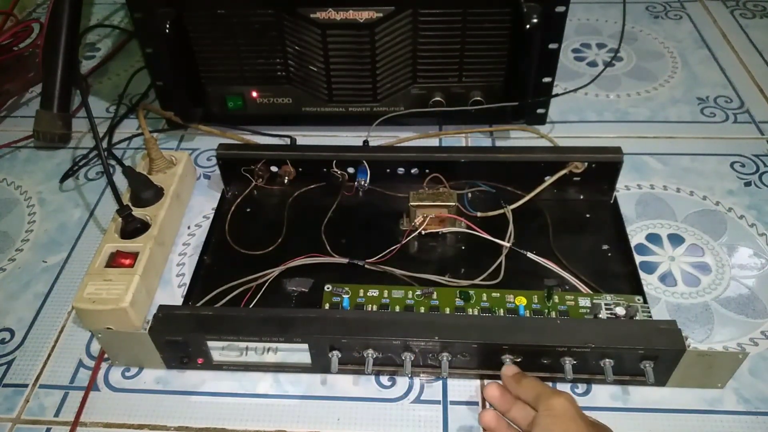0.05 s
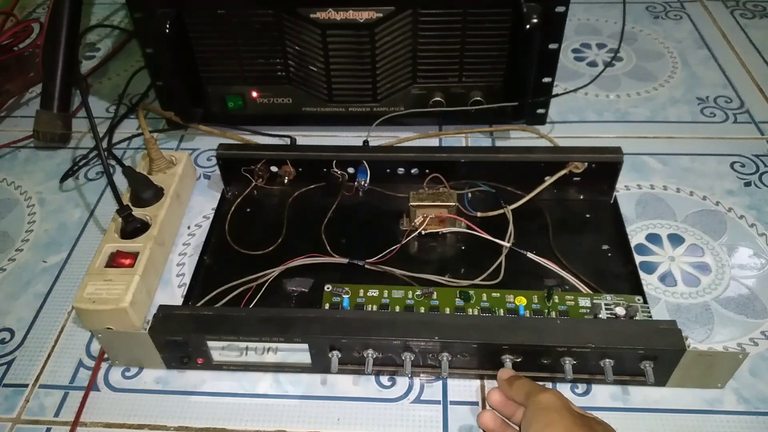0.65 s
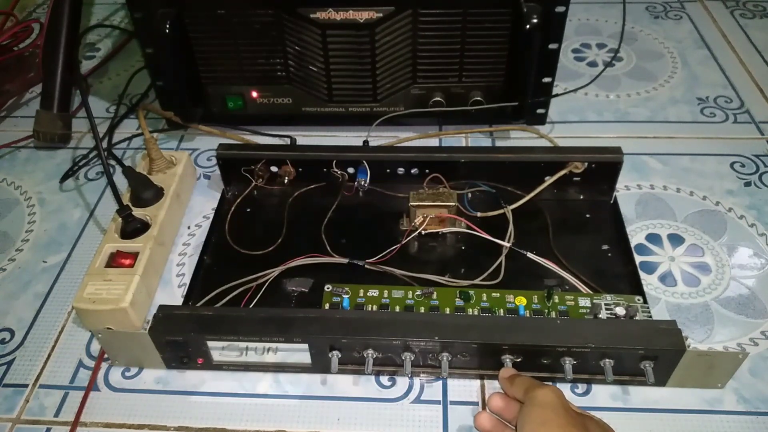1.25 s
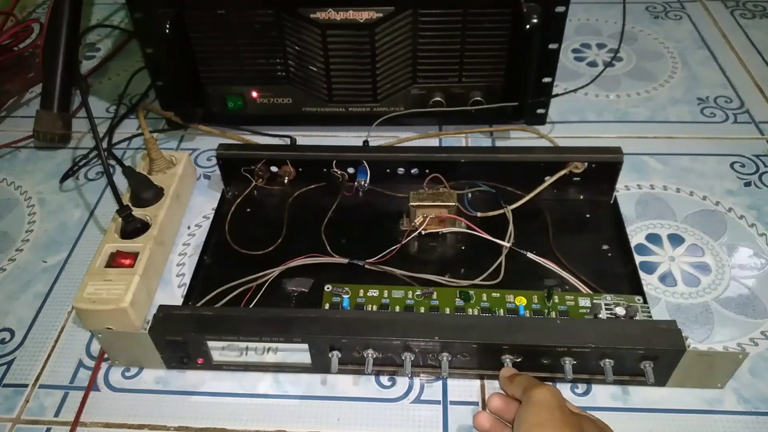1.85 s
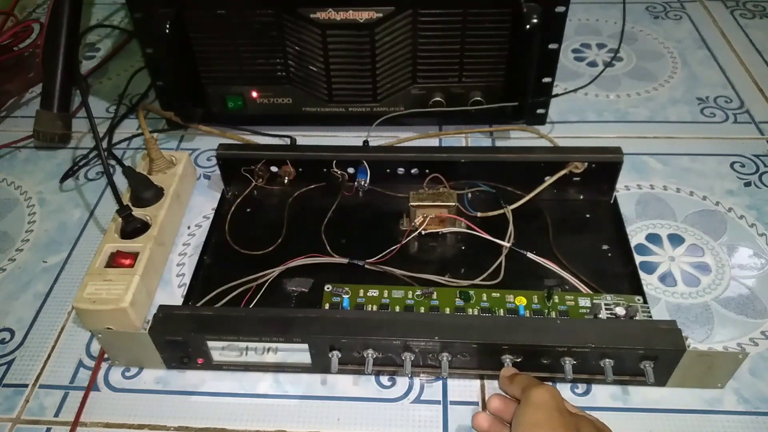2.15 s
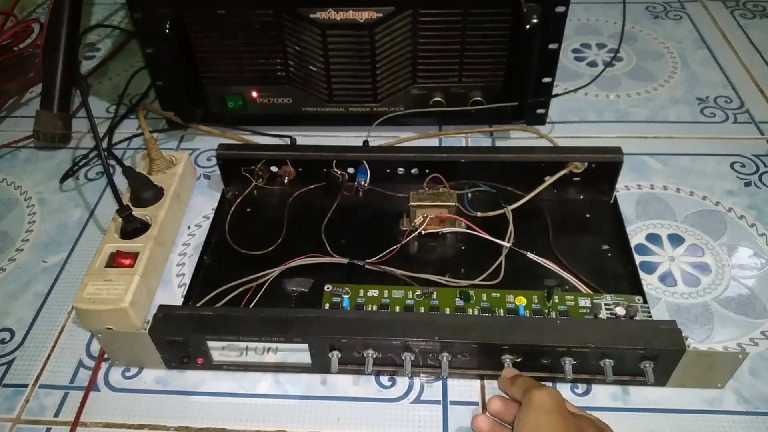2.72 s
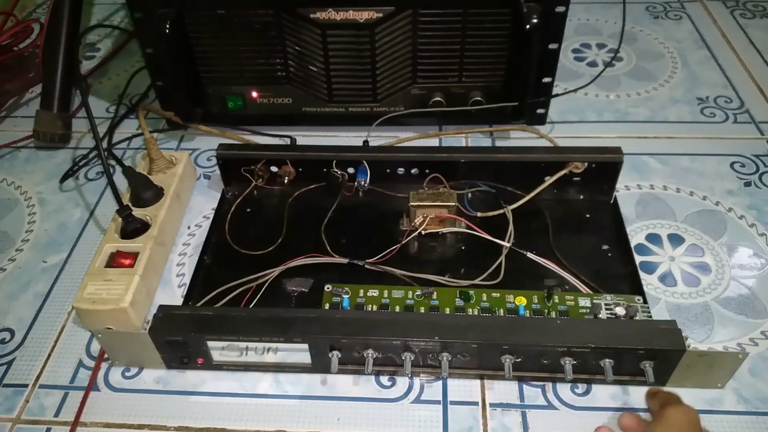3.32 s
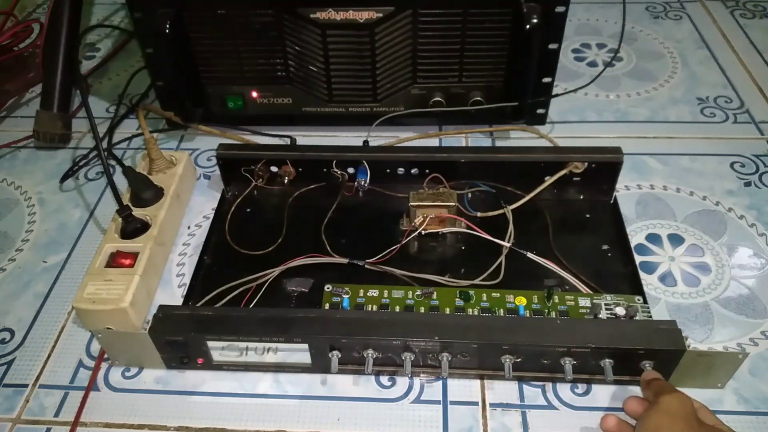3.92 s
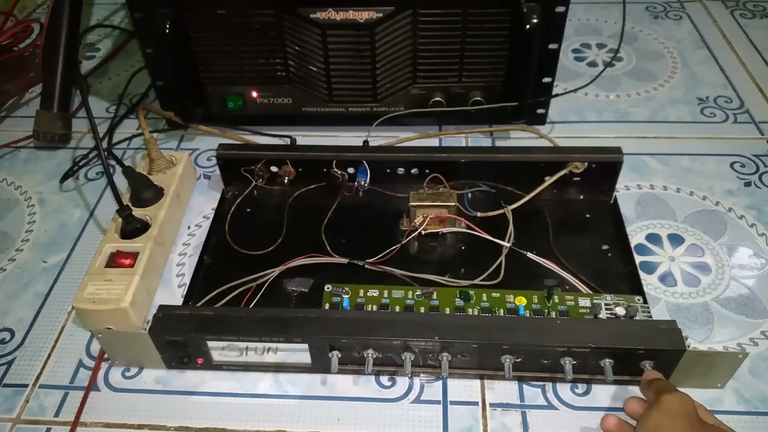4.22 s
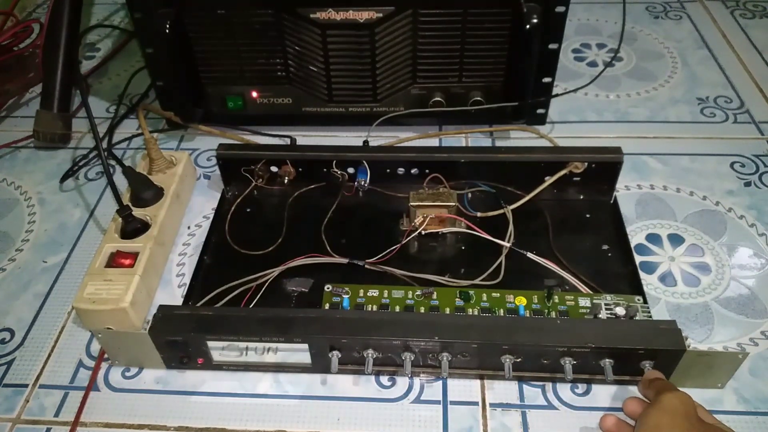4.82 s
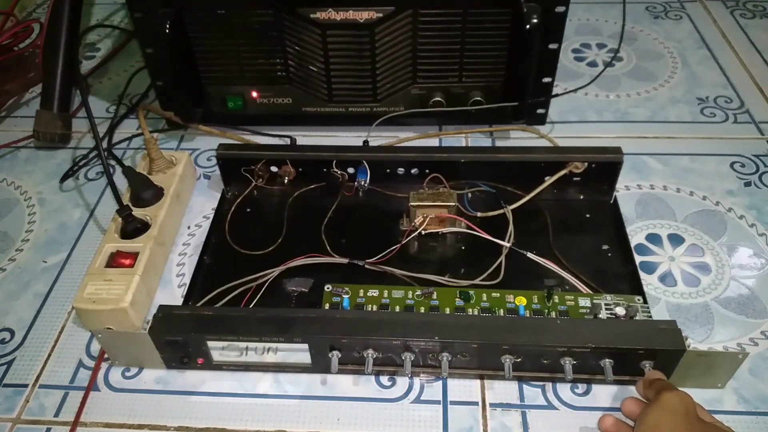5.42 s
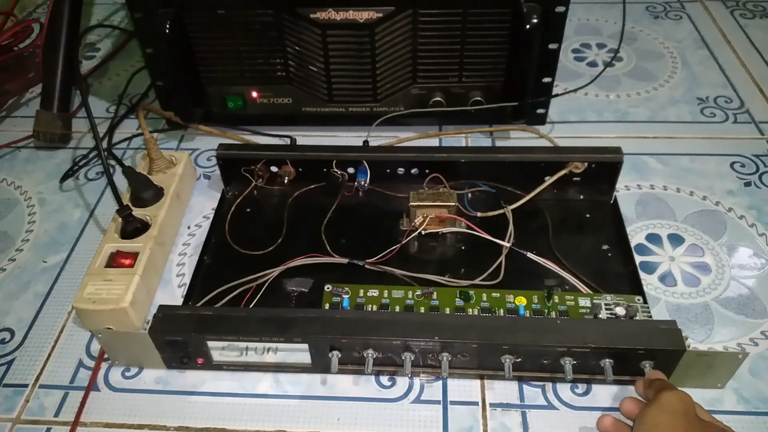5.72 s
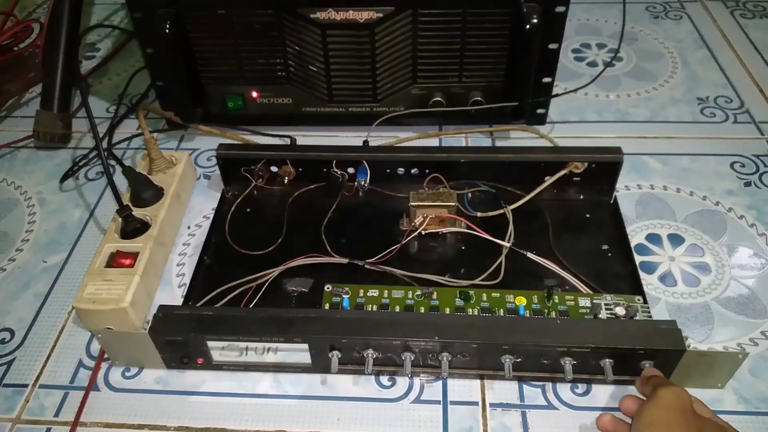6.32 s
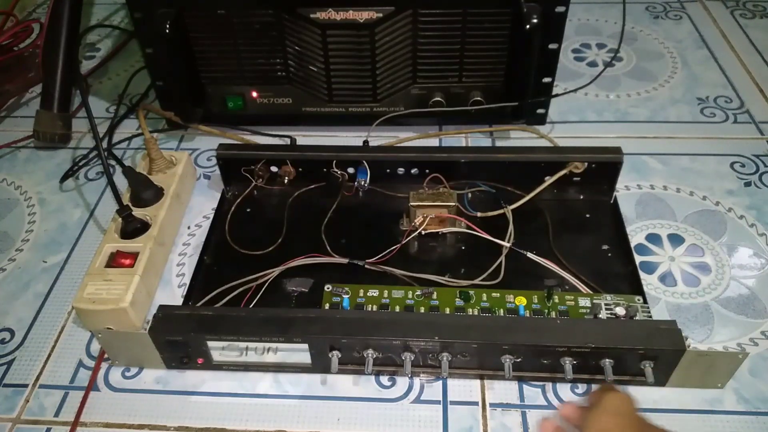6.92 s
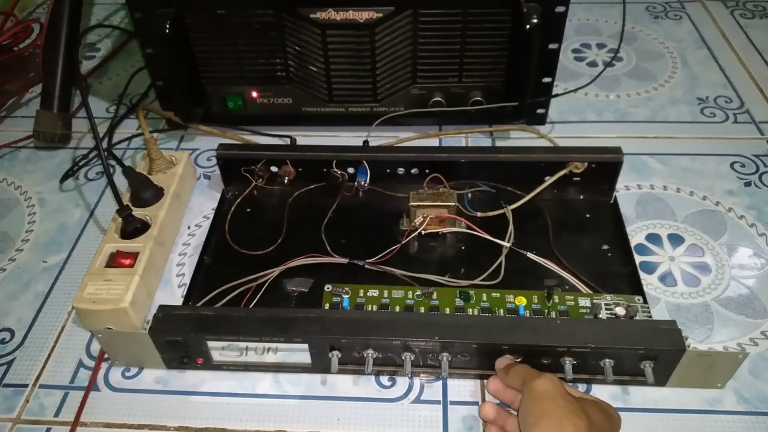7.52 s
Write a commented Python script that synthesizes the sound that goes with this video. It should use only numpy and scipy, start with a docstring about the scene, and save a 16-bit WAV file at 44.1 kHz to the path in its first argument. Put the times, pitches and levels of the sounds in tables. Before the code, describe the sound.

Two small cooling fans whir steadily in an amplifier, a rush of air with a pulsing hum and two faint knob ticks.

```python
"""A rush of air and blade tones beating about five times a second: two small seven-bladed fans,
at slightly different speeds, cool an amplifier on a tiled floor. Case and room colour the rush;
a hum and a thin whine lie under it. Early on come two soft microphone bumps; a hand makes two
faint ticks and a rub at the knobs. Near the end a low drone joins briefly."""
import sys
import numpy as np
from scipy import signal
from scipy.fft import rfft, irfft
from scipy.io import wavfile
from scipy.ndimage import uniform_filter1d

SR = 44100
rng = np.random.default_rng(int(sys.argv[2]) if len(sys.argv) > 2 else 0)


def dump_mix(stems):
    """Bounce the given channels to the path in sys.argv[1] as a 16-bit WAV at rate SR."""
    frames = np.atleast_2d(stems).T  # one column per channel
    limited = np.clip(frames, -1, 1)  # hard clip at full scale
    pcm = np.round(limited * 32767).astype(np.int16)
    wavfile.write(sys.argv[1], SR, pcm)


N = 337806

# Speed deficit of the slow fan: t/s, slip/Hz
FAN_SLIP = [(0.0, 0.755), (0.7, 0.659), (1.5, 0.697), (2.2, 0.772), (3.2, 0.737), (4.0, 0.795),
            (5.2, 0.729), (6.2, 0.688), (7.66, 0.696)]
# Tones per fan: shaft harmonic (rounded in use), left level/dB, right level/dB, left lead/rad
FAST_FAN_TONES = [(1, -67, -70, -1), (7, -41, -45, 0.24), (14, -62.5, -63.5, 1.8), (19.75, -72.5, -65, 2.6),
                  (21, -69.5, -68, 3), (28, -64.5, -71, -0.3), (30, -73.5, -78, 0),
                  (32, -63.5, -65.5, -1.5), (35, -71.5, -84, 2.5), (36, -70, -75.5, -2.5),
                  (44, -84.5, -77.5, -7.5), (60, -72, -81, -5.5)]
SLOW_FAN_TONES = [(1, -66, -66, -.4), (7, -42.5, -46.5, 0.23), (14, -59, -61, 0.086),
                  (21, -70, -69.5, 0.58), (28, -59.5, -68, .6), (30, -78, -80.5, 1.7)]
# Slow timbre changes: t/s, mid-range rush gain/dB, upper fan tone gain/dB
TIMBRE = [(0, -0.4, -7), (1.3, -0.3, -4), (2.1, 0.8, -1), (3.2, 0.6, 1), (5.0, 0.4, 0.5), (6.5, .3, -1),
          (7.66, 1.1, -3)]
# Air rush, in-phase (mid) and antiphase (side) parts: f/Hz, level in 1 Hz/dB
AIR_MID = [(20, -70), (32, -74.5), (100, -78), (120, -66), (250, -67.5), (520, -74.5), (800, -81),
           (1100, -80.5), (1600, -89.5), (3400, -94.5), (6200, -108.6), (9300, -106.0), (11300, -125.0),
           (15500, -131.9)]
AIR_SIDE = [(20, -73), (35, -78), (95, -88), (140, -86), (330, -78.5), (700, -84), (800, -82),
            (1600, -88.5), (3400, -93.5), (6200, -108.3), (9300, -122.1), (11500, -140.1), (15500, -140.0)]
# Peaks and dips of case and room: f/Hz, width/Hz, mid gain/dB, side gain/dB
CASE_ROOM_MODES = [(137.7, 33, 12, 10), (194, 10, -1, 11.5), (221.4, 10, 5.5, 4), (255.5, 20, 5, -5.5),
                   (317, 20, 3.5, -4), (355.6, 15, 5.5, -7), (390, 7, -4, -7.5), (443.8, 27, 7.5, 6.5),
                   (477, 16.4, 7, 5.5), (510, 46, 7.5, -1), (631.8, 33.4, 8, 4.5), (660, 13, 7, -4.5),
                   (683, 40, 1, 8.5), (787, 29, -5.5, 2.5), (938, 48, -5.5, -3), (1158, 24, -4, -1.5),
                   (1330, 27, 0.5, 0), (1507, 84, 1, 1.5), (2012, 110, 6, -4), (2650, 130, 3.5, -1.5),
                   (2840, 110, 2.5, -3), (3270, 140, 3, 2), (3480, 67, 3.5, 1.5), (3820, 95, 4, -2)]
# Rush balance: f/Hz, left minus right/dB
AIR_BALANCE = [(60.0, 1.5), (160.0, 1.5), (290.0, 1.5), (400.0, 0), (600.0, -1.5), (730.0, 2),
               (900.0, -0.5), (1150.0, 3.5), (1600.0, -2.5), (2450.0, 4.5), (4000.0, -0.5), (5200.0, 4.5),
               (7500.0, 5.5), (10200.0, -1)]
# Rush phase between channels: f/Hz, left lead/rad
AIR_LEAD = [(300, 0), (380, -0.081), (540, 0.56), (650, 1.4), (760, .6), (1100, 0.29), (1500, .1),
            (2200, 0.18), (3200, 0.085)]
# Random swells and dips in the rush's low rumble (105-175 Hz), before centring and scaling:
# t/s, level/dB
RUMBLE_SWELLS = [(0.0, -41.5), (0.21, -46.5), (0.44, -36), (0.48, -44.5), (0.71, -35), (0.75, -44.5),
                 (1.46, -40), (1.5, -46.5), (1.92, -47.5), (2.09, -38.5), (2.13, -52), (2.36, -38.5),
                 (2.67, -50), (2.69, -40.5), (4.95, -44), (5.01, -36), (5.05, -52), (5.16, -42),
                 (5.85, -43.5), (5.93, -35), (6.04, -45.5), (6.31, -35.5), (6.35, -44), (7.5, -44.5)]
# Hum and electrical whine: f/Hz, level/dB
HUM_TONES = [(62, -60), (8717, -89)]
# Two microphone bumps, one knob rub: t/s, 1/e half-width/s, low f/Hz, high f/Hz, level/dB
TOUCHES = [(.09, .05, 18, 40, -50), (.38, .05, 18, 45, -47), (2.1, 0.049, 3600, 5400, -66)]
# Knob contacts: t/s, impulse level/dB, settling delay/s, settling gain/dB
KNOB_TICKS = [(0.2738, -51, 0.01, -9), (1.3042, -44, 0.0029, -7)]
# Knob modes: f/Hz, gain/dB, T60/s
KNOB_RING = [(3190, 4.5, 0.011), (3700, -2, .007), (5200, -6, .006), (7670, -9.5, 0.013),
             (8460, -4, 0.0065), (9300, -3, 0.0056), (12000, -17, 0.0018)]


def from_db(db):
    return 10 ** (np.asarray(db) / 20)


def over_time(table):
    """Each value column, interpolated per sample."""
    t_s, *columns = np.transpose(table)
    return [np.interp(np.arange(N) / SR, t_s, column) for column in columns]


def bin_hz():
    return np.maximum(np.arange(N // 2 + 1) * SR / N, 1)


def over_frequency(table):
    """Value per FFT bin, interpolated on log f."""
    f_hz, values = np.transpose(table)
    return np.interp(np.log(bin_hz()), np.log(f_hz), values)


def drift(corner_hz):
    """Slow noise, unit variance."""
    slow = irfft(rfft(rng.standard_normal(N)) / (1 + (bin_hz() / corner_hz) ** 2) ** 2, N)
    return slow / slow.std()


def bandpass(x, edges_hz):
    """Zero-phase band filter."""
    return signal.sosfiltfilt(signal.butter(3, edges_hz, "band", fs=SR, output="sos"), x)


def tone(phase_rad, rms_db):
    return np.sqrt(2) * from_db(rms_db) * np.cos(phase_rad)


def fan(shaft_hz, tones, upper_db, waver_db, wobble_turns):
    """Shaft harmonics; the seventh, one push per blade, dominates."""
    turns = np.cumsum(shaft_hz) / SR + wobble_turns * drift(3.0)
    inflow_db = waver_db * drift(2.8)   # uneven inflow varies the blade load
    out = np.zeros((2, N))
    for harmonic, left_db, right_db, lead_rad in tones:
        phase_rad = 2 * np.pi * round(harmonic) * turns
        swell_db = inflow_db + upper_db * (harmonic > 20)
        out[0] += tone(phase_rad + lead_rad / 2, left_db + swell_db)
        out[1] += tone(phase_rad - lead_rad / 2, right_db + swell_db)
    return out


def airflow():
    """Turbulence at blades and grille, coloured by case and room."""
    level_db = np.array([over_frequency(AIR_MID), over_frequency(AIR_SIDE)])
    for f_hz, width_hz, mid_db, side_db in CASE_ROOM_MODES:
        peak = 1 / (1 + (2 * (bin_hz() - f_hz) / width_hz) ** 2)
        level_db += np.outer([mid_db, side_db], peak)
    mid, side = rfft(rng.standard_normal((2, N))) * from_db(level_db) * np.sqrt(SR / 2)
    pan = from_db(over_frequency(AIR_BALANCE) / 2) * np.exp(0.5j * over_frequency(AIR_LEAD))
    stereo = np.array([(mid + side) * pan, (mid - side) / pan])
    echo_share = over_frequency([(400, 0), (900, 1), (6000, 1), (8000, 0)])
    room = 1 + echo_share * (reflections() - 1)
    return irfft(stereo * room, N)


def reflections(count=24, echo_db=-27, longest_s=0.03):
    """Spectral ripple from early floor and wall echoes, per channel."""
    delay_samples = (rng.uniform(0.1012, 1, (count, 2)) * longest_s * SR).astype(int)
    response = np.zeros((2, N))
    response[:, 0] = 1
    response[np.arange(2), delay_samples] += from_db(echo_db) * rng.choice([-1, 1], (count, 2))
    return rfft(response / np.linalg.norm(response, axis=1, keepdims=True))


def surge(air, midrange_db, rumble_db=-42.5, swing=0.84, window_s=0.35, steadiness=0.73):
    """The low rumble of the rush swells and dips irregularly; the mid-range shifts slowly."""
    rumble = bandpass(air, edges_hz=(105, 175))
    running_rms = np.sqrt(uniform_filter1d(rumble.mean(axis=0) ** 2, int(window_s * SR)) + 1e-12)
    evened = rumble / running_rms ** steadiness
    swell_db, = over_time(RUMBLE_SWELLS)
    gain = from_db(rumble_db + swing * (swell_db - swell_db.mean())) / evened.mean(axis=0).std()
    midrange_shift = bandpass(air, edges_hz=(400, 750)) * (from_db(midrange_db) - 1)
    return air - rumble + gain * evened + midrange_shift


def hum(waver_db=3.5):
    """Hum and electrical whine: steady pitch, wavering level."""
    t_s = np.arange(N) / SR
    return sum(tone(2 * np.pi * f_hz * t_s, db + waver_db * drift(1.8)) for f_hz, db in HUM_TONES)


def handling():
    """Each touch is a smooth swell of friction noise."""
    t_s = np.arange(N) / SR
    out = np.zeros(N)
    for peak_s, half_width_s, low_hz, high_hz, level_db in TOUCHES:
        noise = bandpass(rng.standard_normal(N), (low_hz, high_hz))
        swell = np.exp(-((t_s - peak_s) / half_width_s) ** 2)
        out += from_db(level_db) * noise / noise.std() * swell
    return out


def knob_snap(impulses, gain_db=-5, t60_s=0.007, edges_hz=(2600, 9500)):
    """Dry crack of each contact: a decaying noise burst."""
    decay = np.exp(-np.log(1000) / (t60_s * SR))
    burst = signal.lfilter([1], [1, -decay], impulses) * rng.standard_normal(N)
    treble = signal.butter(2, edges_hz, "band", fs=SR, output="sos")
    return from_db(gain_db) * signal.sosfilt(treble, burst)


def knob_ticks(pan_db=(3, -3)):
    """A contact and a softer settling touch ring the knob's modes."""
    impulses = np.full(N, 1e-18)
    for t_s, level_db, settle_s, settle_db in KNOB_TICKS:
        impulses[round(t_s * SR)] += from_db(level_db)
        impulses[round((t_s + settle_s) * SR)] += from_db(level_db + settle_db)
    ring = np.zeros(N)
    for k, (f_hz, gain_db, t60_s) in enumerate(KNOB_RING):
        decay = np.exp(-np.log(1000) / (t60_s * SR))
        step_rad = 2 * np.pi * f_hz / SR
        poles = [1, -2 * decay * np.cos(step_rad), decay ** 2]
        ring += (-1) ** k * from_db(gain_db) * signal.lfilter([0, np.sin(step_rad)], poles, impulses)
    return np.outer(from_db(pan_db), ring + knob_snap(impulses))


def drone(f_hz=78.2, full_s=7.15, hold_s=0.31, rise_db_per_s=130, fall_db_per_s=50):
    """A low note with a strong third harmonic swells, holds, fades."""
    t_s = np.arange(N) / SR - full_s
    swell_db = rise_db_per_s * np.minimum(t_s, 0) - fall_db_per_s * np.maximum(t_s - hold_s, 0)
    phase_rad = 2 * np.pi * f_hz * t_s
    return from_db(swell_db) * (tone(phase_rad, rms_db=-52.5) + tone(3 * phase_rad, rms_db=-43))


def scene(fast_hz=40.547):
    """Stereo sum of fans, rush, hum and small sounds."""
    midrange_db, upper_db = over_time(TIMBRE)
    slip_hz, = over_time(FAN_SLIP)
    shaft_hz = np.full(N, fast_hz)
    fast_fan = fan(shaft_hz, FAST_FAN_TONES, upper_db, waver_db=0.53, wobble_turns=0.0036)
    slow_fan = fan(shaft_hz - slip_hz, SLOW_FAN_TONES, upper_db, waver_db=0.5, wobble_turns=0.003)
    rush = surge(airflow(), midrange_db)
    return fast_fan + slow_fan + rush + hum() + knob_ticks() + handling() + drone()


def record(dry, fade_s=0.0014, cutoff_hz=15700):
    """Click-free ends, steep low-pass."""
    edge_samples = np.minimum(np.arange(N), np.arange(N)[::-1])
    fade = np.minimum(edge_samples / (fade_s * SR), 1)
    lowpass = signal.ellip(10, 0.1, 80, cutoff_hz, fs=SR, output="sos")
    return signal.sosfilt(lowpass, dry * fade)


dry = scene()
out = record(dry)
dump_mix(out)
```